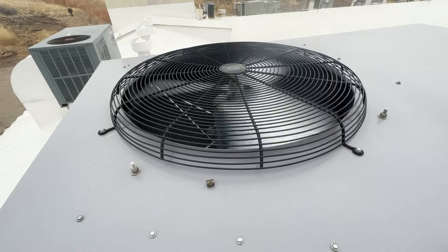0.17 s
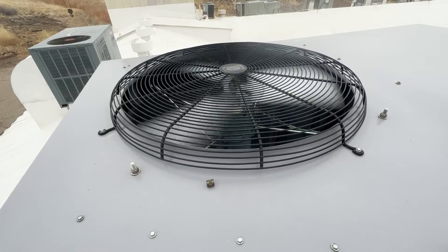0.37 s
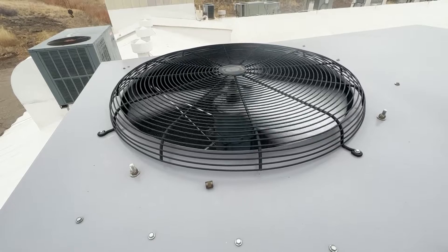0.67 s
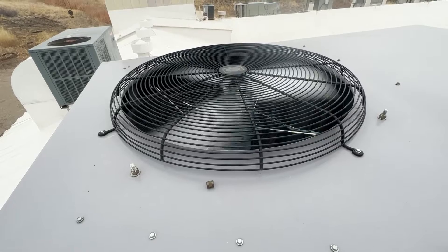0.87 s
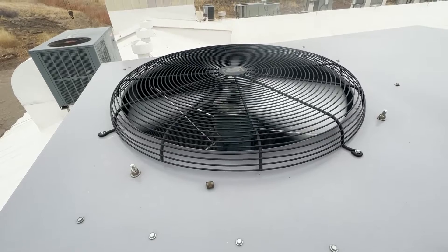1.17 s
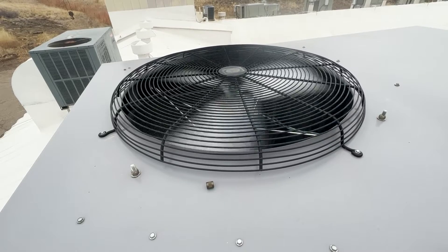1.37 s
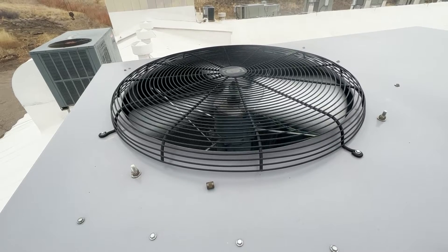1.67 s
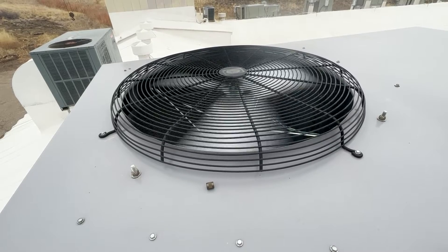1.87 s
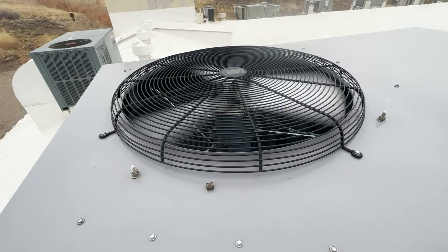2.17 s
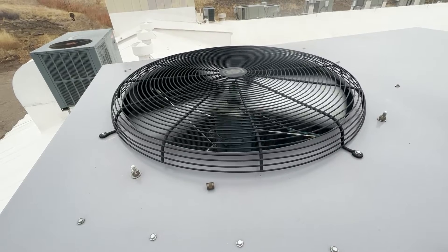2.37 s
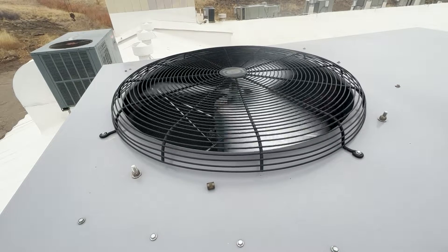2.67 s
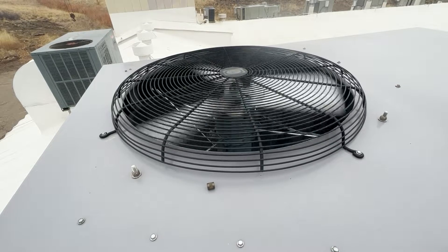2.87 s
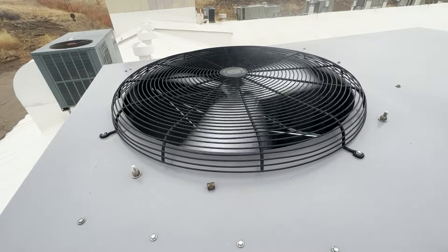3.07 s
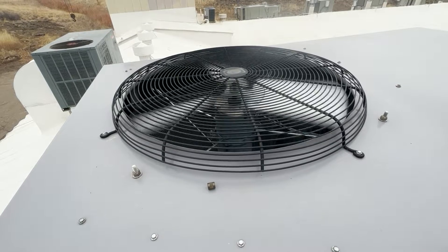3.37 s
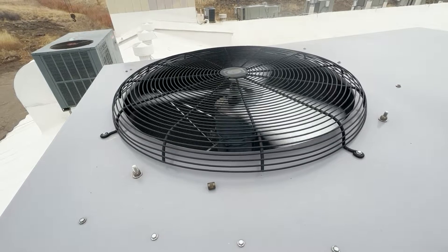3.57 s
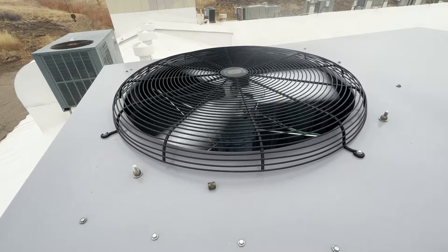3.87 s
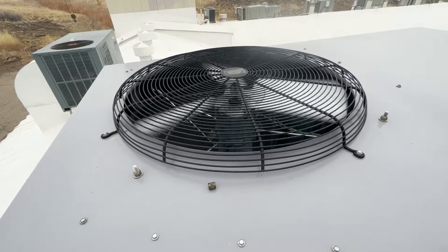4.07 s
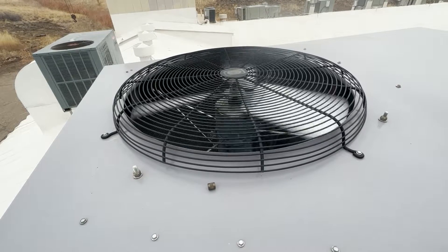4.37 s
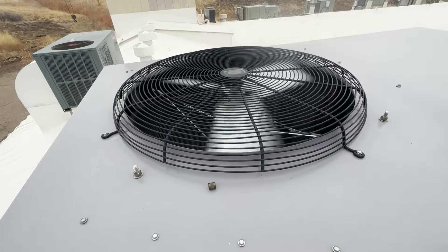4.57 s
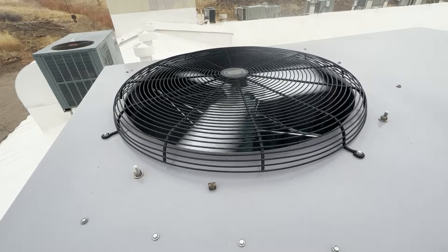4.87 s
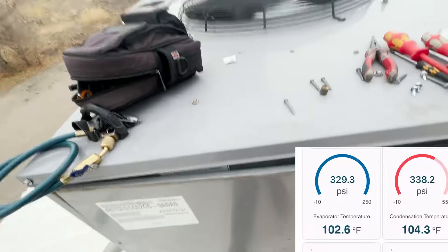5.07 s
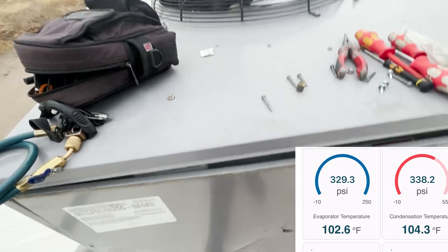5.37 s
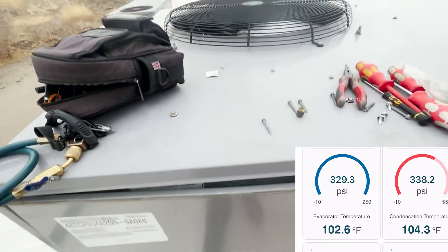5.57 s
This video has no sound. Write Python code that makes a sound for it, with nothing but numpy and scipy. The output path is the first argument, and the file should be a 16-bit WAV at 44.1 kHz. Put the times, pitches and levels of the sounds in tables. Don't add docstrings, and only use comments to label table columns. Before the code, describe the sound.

A big rooftop condenser fan roars with fast choppy blade beats, then loses power and winds down before a cut to quieter cabinet hum and hiss.

```python
import sys
import numpy as np
from scipy import signal
from scipy.fft import rfft, irfft
from scipy.io import wavfile

SR = 44100
rng = np.random.default_rng(int(sys.argv[2]) if len(sys.argv) > 2 else 0)


def wav_out(sig):
    wavfile.write(sys.argv[1], SR, np.round(np.clip(np.atleast_2d(sig).T, -1, 1) * 32767).astype(np.int16))


def gain_from_db(level_db):
    decades = np.asarray(level_db, float) / 20
    return 10 ** decades


N = 251976
T = np.arange(N) / SR
HZ = np.fft.rfftfreq(N, 1 / SR)
CUT_S, BACK_S = 5.047, 5.058
FULL_HZ = 57.73


def evened(x):
    return x / np.sqrt(np.mean(x ** 2) + 1e-20)


def read(points, column=1):
    rows = np.transpose(points)
    return np.interp(np.log(HZ + 1), np.log(rows[0] + 1), rows[column])


def curve(rows, column=1):
    rows = np.transpose(rows)
    return np.interp(T, rows[0], rows[column])


def colour(x, points):
    return evened(irfft(rfft(x) * gain_from_db(read(points)), N))


def drift(hz):
    return evened(irfft(rfft(rng.standard_normal(N)) / (1 + (HZ / hz) ** 2), N))


def ports(a, b, table, lead):
    same, a, b = np.clip(read(table), 0, 1), rfft(a), rfft(b)
    right = (same * a + np.sqrt(1 - same ** 2) * b) * np.exp(-1j * read(lead))
    half_db = read(table, column=2) / 2
    pair = irfft(np.array([a * gain_from_db(half_db), right * gain_from_db(-half_db)]), N)
    return pair / np.sqrt(np.mean(pair.mean(0) ** 2))


def noise(points, table, lead, gate=1.):
    a, b = (colour(gate * rng.standard_normal(N), points) for _ in range(2))
    return ports(a, b, table, lead)


def tones(lines, waver_db):
    out = np.zeros((2, N))
    for hz, db in lines:
        start = rng.uniform(0, 2 * np.pi)
        spread = rng.uniform(-0.78, 1) * min(hz / 500, 1.2)
        level = np.sqrt(2) * gain_from_db(db + waver_db * drift(hz=22)) / np.cos(spread)
        out += level * np.cos(2 * np.pi * hz * T + start + spread * np.array([[1], [-1]]))
    return out


# time_s, blade_rate_hz
SPIN_UP = [
    (0, 48),
    (.15, 52),
    (.35, FULL_HZ),
]


def rotor():
    power_off_s, drag_per_s = 2.25, .65
    return curve(SPIN_UP) / (1 + drag_per_s * np.maximum(T - power_off_s, 0))


# time_s, load_db, turbulence_share (0-1)
INFLOW = [(0, -3.5, 0.82), (.1, -3.5, 0.96), (.26, 1, 0.54), (.4, -9, 0.9), (.5, 1.5, 0.27), (.74, 3, 0.21),
          (.87, -2, 0.47), (1.0, 1, 0.27), (1.42, -3.5, 0.34), (1.5, -1.5, 0.33), (1.76, -3, 0.41),
          (2.2, -2.5, 0.31), (2.5, -2.5, 0.4), (2.82, 2, 0.29), (2.92, -1, 0.57), (3.25, 1, 0.38),
          (4.2, -2.5, 1), (4.9, 3.5, 1)]


def driven(speed, full_db, slope, follows, stirred_db):
    load_db = follows * curve(INFLOW) + stirred_db * curve(INFLOW, column=2)
    return gain_from_db(full_db + load_db) * (speed / FULL_HZ) ** slope


def overtones(late, lag, wander):
    out = 0
    for k in range(2, 20):
        strength = 1 + 0.33 * drift(hz=8.8)
        out = out + strength * np.cos(k * 2 * np.pi * late - lag + wander * drift(hz=5.1))
    return out


# pitch_hz, level_db
PULSE = [(40, -20.5), (70, 0), (120, 3), (230, 0.5), (300, -3), (350, -5), (420, -11), (480, -14),
         (600, -51.5)]
# pitch_hz, level_db
CHOP = [(200, -28), (300, -10.5), (400, 5), (500, 1), (620, 3), (800, 7.5), (950, 4), (1100, -6.5),
        (1400, -3.5), (2500, -39.5), (4000, -41.5)]
# pitch_hz, level_db_per_hz
AIR = [(650, -63), (1100, 2.5), (1480, -9), (2360, -2.5), (3800, -9.5), (4860, -9.5), (7650, -18),
       (8260, -15), (9870, -19.5), (10800, -66.5), (11700, -22), (12600, -27.5), (15500, -32.5)]
# pitch_hz, likeness (0-1), left_over_right_db
PORTS = [(60, .95, 4), (130, .9, .5), (250, .84, -1.5), (500, .85, -.5), (800, .88, .3), (1300, .68, 2),
         (2400, .52, -3.5), (4400, .33, 2.5), (8000, .33, 1), (11000, .4, 0), (12000, .95, 0),
         (13200, .9, 0), (15000, .4, 0)]
# pitch_hz, left_lead_rad
LEAD = [(60, -.3), (200, .2), (400, .7), (750, 1.15), (1290, 2.4), (2760, 9.3), (3530, 11.1), (5680, 10.3),
        (7240, 14.4), (9910, 16.3), (11600, 15.5), (12300, 12.6), (16000, 12.6)]


def fan():
    speed = rotor()
    turns = np.cumsum(speed) / SR + .11
    tone_lag = 3.2
    tone = np.sqrt(2) * np.cos(2 * np.pi * turns - tone_lag + np.array([[-.3], [.35]]))
    tone *= gain_from_db(np.array([[2.0], [-2.3]]))

    late = turns - .167
    unload_hz, unload_span_hz, unload_rad = 47, 9, 2.5
    lag = .5 - unload_rad * np.clip((unload_hz - speed) / unload_span_hz, 0, 1)
    stack, unlike = (colour(overtones(late, lag, wander) / np.sqrt(speed), PULSE) for wander in (.3, 1.5))

    opening = turns + 0.0012 * speed
    size_db = 0.58 * rng.standard_normal(400)[np.floor(opening).astype(int)]
    since_s = opening % 1 / speed
    burst = gain_from_db(size_db) * np.exp(-since_s / .0021) * (1 - np.exp(-since_s / .001))

    share = np.clip(curve(INFLOW, column=2), 0, 1)
    eddies = noise(PULSE, PORTS, LEAD, gate=(0.97 + burst) * gain_from_db(1. * drift(hz=6)))
    pulses = np.sqrt(1 - share ** 2) * ports(stack, unlike, PORTS, LEAD) + share * eddies

    steady = share + 0.067 * (1 - speed / FULL_HZ)
    chop = noise(CHOP, PORTS, LEAD, gate=(steady + burst) * gain_from_db(1.1 * drift(hz=25)))
    passed = np.maximum.accumulate(np.floor(opening + 0.011 * drift(hz=61.7)))
    edges = np.roll(np.diff(passed, prepend=0) * gain_from_db(4.1 * size_db), 60)
    clicks = ports(colour(edges, CHOP), colour(np.roll(edges, 9), CHOP), PORTS, LEAD)
    chop = chop + 0.45 * (1 - share) * clicks

    air = noise(AIR, PORTS, LEAD, gate=(1.3 + burst) * gain_from_db(1.0 * drift(hz=46.8)))
    hiss_gain = driven(speed, full_db=-38, slope=4, follows=0.4, stirred_db=6.5)
    hiss_gain = np.hypot(hiss_gain, gain_from_db(-54))
    fade_in = np.minimum(0.25 + T / .03, 1)
    out = driven(speed, full_db=-9, slope=4.5, follows=-0.02, stirred_db=-11.5) * tone
    out = out + driven(speed, full_db=-9.5, slope=4, follows=1.12, stirred_db=-1) * pulses
    out = out + driven(speed, full_db=-21.5, slope=4, follows=0.73, stirred_db=-2.5) * chop
    return out + hiss_gain * fade_in * air


# start_s, peak_db
SNAPS = [(.249, -10), (.319, -17.5), (.459, -8.5), (.511, -12.5), (.529, -5), (.581, -4.5), (.668, -7),
         (.703, -8.5), (.72, -5.5), (.754, -8.5), (.876, -7.5), (.912, -15.5), (.979, -7), (1.015, -6.5),
         (1.066, -13.5), (1.134, -8), (1.48, -6.5), (1.602, -10.5), (2.0, -8), (2.226, -13), (2.332, -9.5),
         (2.369, -16), (2.534, -17), (2.609, -27), (2.81, -13), (3.283, -23), (3.342, -21), (3.434, -29)]


def snaps():
    out, t = np.zeros(N), T[:500]
    slowing = (rotor() / FULL_HZ) ** 0.27
    for (s, db), (a, b) in zip(SNAPS, rng.random((len(SNAPS), 2))):
        hz = 800 * slowing[round(s * SR)] * (1 + 0.17 * (2 * a - 1))
        ring = np.sin(2 * np.pi * hz * t) + 0.1 * np.sin(2 * np.pi * (1.6 * hz * t + b))
        decay = gain_from_db(db - 1.0 - 60 * t / 0.018)
        out[round(s * SR):][:len(t)] += decay * (1 - np.exp(-t / 0.00049)) * ring
    return out.std() * ports(out, np.roll(out, 9), PORTS, LEAD)


# start_s, peak_db, pitch_hz
TICKS = [
    (.054, -25, 3800),
    (.086, -26, 3900),
    (.108, -25, 3700),
    (.115, -30, 5500),
    (.185, -20, 1500),
    (4.9, -42, 1800),
]


def ticks():
    out, t = np.zeros(N), T[:400]
    for s, db, hz in TICKS:
        ring = np.sin(2 * np.pi * hz * t)
        ring += .8 * np.sin(2 * np.pi * .7 * hz * t) + 1.4 * np.sin(2 * np.pi * .33 * hz * t)
        out[round(s * SR):][:len(t)] += gain_from_db(db - 60 * t / .012) * (1 - np.exp(-t / .0003)) * ring
    return out * gain_from_db(np.array([[1.5], [-1.5]]))


# pitch_hz, level_db
WHINE = [(360.7, -51.5), (479.1, -51.5), (586.8, -75.5), (646.0, -65), (764.4, -61.5), (823.6, -60),
         (882.9, -63), (995.9, -86), (1114, -156), (1174, -84), (1233, -66.5), (1523, -67), (1642, -68),
         (1707, -67.5), (1760, -67), (2175, -126), (2353, -78), (2649, -68), (2708, -64), (2939, -70)]
# pitch_hz, level_db_per_hz
ROOF = [(18, -24), (30, -16), (75, 4.5), (360, -22), (421, -33), (480, -31.5), (561, -23.5), (768, -40),
        (1440, -45.5), (2690, -38), (6220, -41.5), (9460, -66.5), (10800, -83), (12900, -44.5),
        (15500, -67)]
# pitch_hz, left_lead_rad
ROOF_LEAD = [(60, 0), (520, -.8), (780, 1.2), (3530, 11), (4910, 12.2), (5770, 10), (7580, 7), (9560, 6.1),
             (11700, 3), (12300, 0), (16000, 0)]


def compressor():
    sag_db = 7.5 * np.maximum(T - 2.88, 0)
    held_back_db = 6.5 * np.clip((3.45 - T) / 0.051, 0, 1)
    level = gain_from_db(-20.5 - sag_db - held_back_db) * np.clip((4.68 - T) / .04, 0, 1)
    shaft = np.sqrt(2) * level * np.cos(2 * np.pi * 58.8 * T + .5 * drift(hz=1.1))
    wash = gain_from_db(-34.5 + 2.0) * noise(ROOF, PORTS, ROOF_LEAD)
    return shaft + tones(WHINE, waver_db=-4.0) + wash


# pitch_hz, level_db
WHINE_NEAR = [(59.2, -38), (118.4, -38.5), (479.1, -44.5), (646.0, -57.5), (818.3, -53), (888.2, -52),
              (1055, -56), (1114, -63), (1168, -52.5), (1233, -51.5), (1292, -49), (1518, -53), (1760, -52),
              (2573, -59), (6169, -61), (6288, -75), (6551, -67), (6611, -62), (6934, -74), (7079, -67)]
# pitch_hz, level_db_per_hz
NEAR = [(18, -39), (30, -2.5), (59, -17), (127, -11.5), (390, -21.5), (475, -14), (538, -19.5),
        (708, -17.5), (1290, -13.5), (1390, -18), (1730, -17.5), (3310, -21), (6990, -28.5), (9900, -36.5),
        (11500, -66), (15000, -100), (22000, -120)]
# pitch_hz, likeness (0-1), left_over_right_db
NEAR_PORTS = [(60, 1, 7), (126, 1, -0.5), (290, 0, 1), (1300, 0, -1.5), (3000, 0.7, 0.5), (7060, 0.1, 1.5)]
# pitch_hz, left_lead_rad
NEAR_LEAD = [(0, 7), (1890, 6.5), (5430, 2), (6550, -1.5), (11500, -2.5), (15200, -4)]
# time_s, level_db
SETTLE = [
    (5.07, 0),
    (5.12, -8),
    (5.19, -0.5),
    (5.25, -2.5),
]


def cabinet():
    since_s = T - BACK_S
    body = noise(NEAR, NEAR_PORTS, NEAR_LEAD, gate=gain_from_db(1.1 * drift(hz=15)))
    low = 1 / (1 + (HZ / 450) ** 4)
    top = 1 / (1 + (6100 / (HZ + 1)) ** 40)
    rumble, rush, hiss = (irfft(rfft(body) * part, N) for part in (low, 1 - low - top, top))
    sag_db = 3.5 * since_s
    level_db = curve(SETTLE) - sag_db
    rumble = gain_from_db(-32 + 1.1 * level_db) * rumble / rumble.mean(0).std()
    rush_rise = np.clip(0.36 + since_s / .04, 0, 1)
    rush = gain_from_db(-45.5 - sag_db) * rush_rise * rush / rush.mean(0).std()
    hiss = gain_from_db(-51.5 + 0.47 * level_db) * hiss / hiss.mean(0).std()

    surge = evened(irfft(rfft(body) * np.exp(-((HZ - 1780) / 200) ** 2), N))
    surge_start_s, surge_s = 5.12, .16
    swell = np.sin(np.pi * np.clip((T - surge_start_s) / surge_s, 0, 1))
    rush = rush + gain_from_db(-51) * swell * surge
    whine = gain_from_db(-3.5) * np.clip(since_s / .04, 0, 1) * tones(WHINE_NEAR, waver_db=1.6)
    return rumble + rush + hiss + whine


# start_s, peak_db, pitch_hz, length_s
GUSTS = [
    (0.079, -11, 49.8, 0.085),
    (0.123, -27, 49.4, 0.03),
    (0.148, -12, 55, 0.059),
    (.24, -28, 68.5, 0.018),
    (4.797, -19, 61.5, 0.082),
    (4.904, -18, 68.6, 0.05),
    (4.959, -22, 88, 0.055),
    (5.014, -12, 125.7, 0.033),
    (5.023, -20, 266, 0.015),
]


def gusts():
    out = np.zeros((2, N))
    for s, db, hz, length_s in GUSTS:
        t = T[:max(round(length_s * SR), 64)]
        swing = np.sin(2 * np.pi * hz * t + np.array([[-.3], [.3]]))
        swing = swing + 0.55 * np.sin(2 * np.pi * 2.27 * hz * t + 6 * rng.random((2, 1)))
        out[:, round(s * SR):][:, :len(t)] += gain_from_db(db) * swing * np.hanning(len(t))
    return out


def scene():
    first = np.clip((CUT_S - T) / 0.0021, 0, 1)
    second = np.clip((T - BACK_S) / 0.002, 0, 1)
    return first * (fan() + snaps() + ticks() + compressor() + gusts()) + second * cabinet()


def top_cut(x):
    return signal.sosfilt(signal.butter(12, 15690, fs=SR, output="sos"), x)


def record(dry):
    bass = signal.sosfilt(signal.butter(4, 42, "high", fs=SR, output="sos"), dry)
    hole = 1 - .995 * np.clip((700 - abs(HZ - 11050)) / 150, 0, 1)
    for dip_hz in (5400, 7600):
        hole *= 1 - 0.55 * np.exp(-((HZ - dip_hz) / 120) ** 2)
    dulled = gain_from_db(-7.0 * (HZ > 11050)) * (HZ < 15700)
    shaped = irfft(rfft(bass) * hole * dulled, N)
    shaped *= 1 - (T > CUT_S) * (T < BACK_S)
    shaped *= np.clip((T[-1] - T) / .004, 0, 1)
    return top_cut(1.145 * np.tanh(shaped / 1.142))


dry = scene()
out = record(dry)
wav_out(out)
```